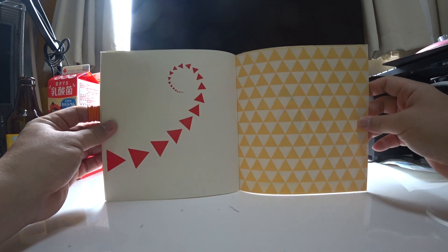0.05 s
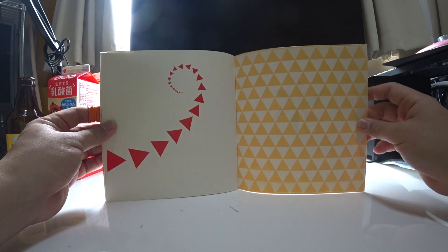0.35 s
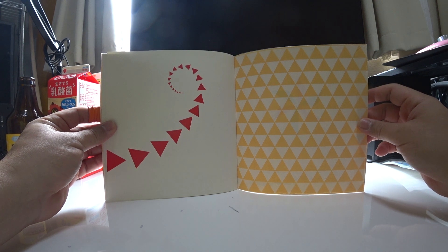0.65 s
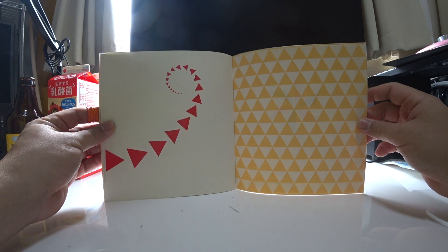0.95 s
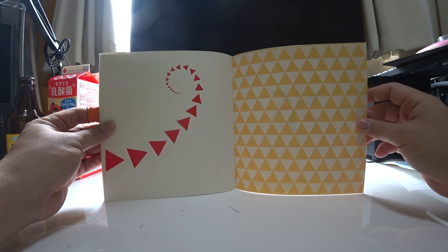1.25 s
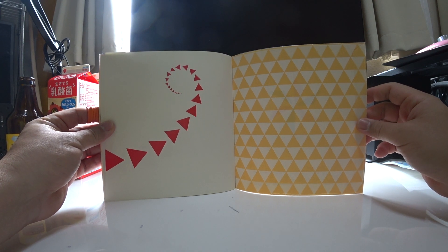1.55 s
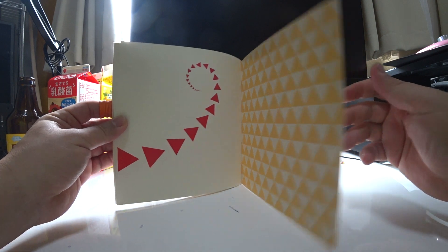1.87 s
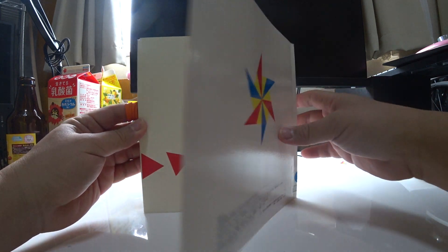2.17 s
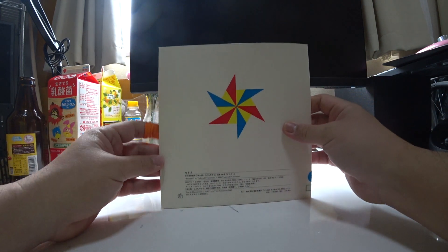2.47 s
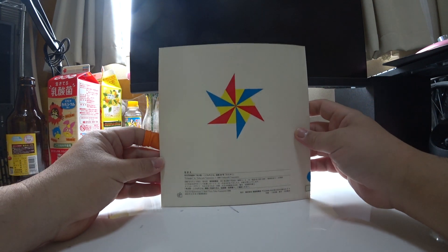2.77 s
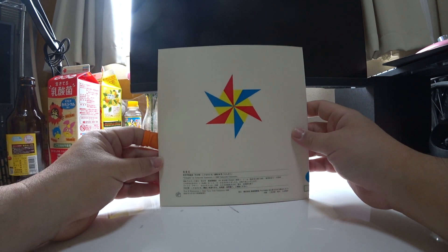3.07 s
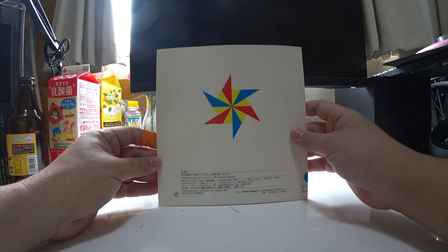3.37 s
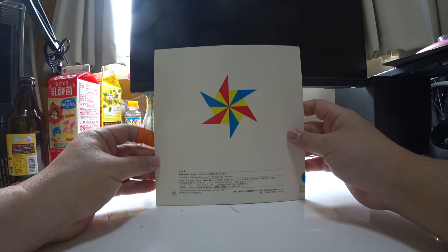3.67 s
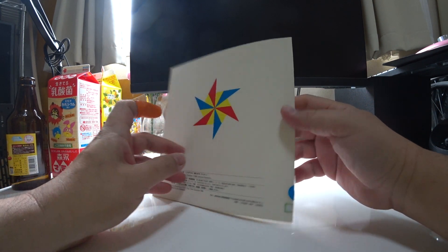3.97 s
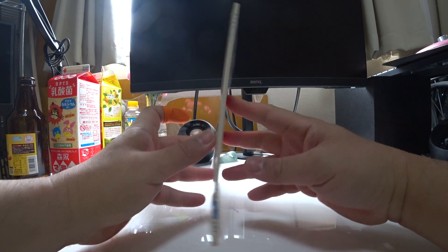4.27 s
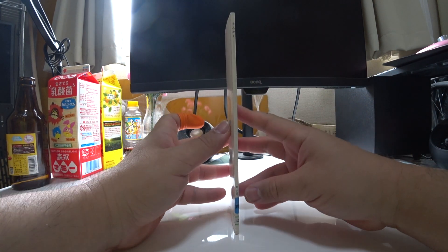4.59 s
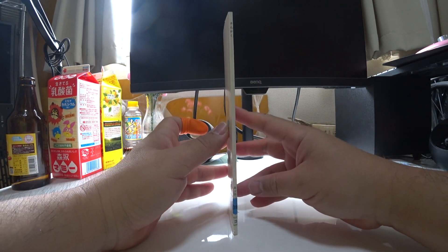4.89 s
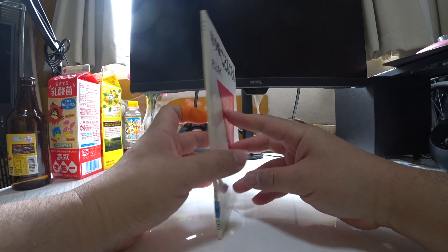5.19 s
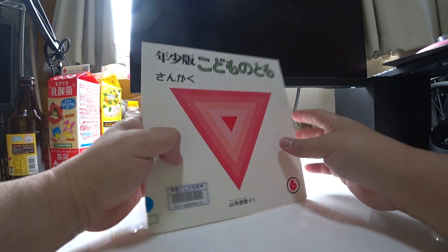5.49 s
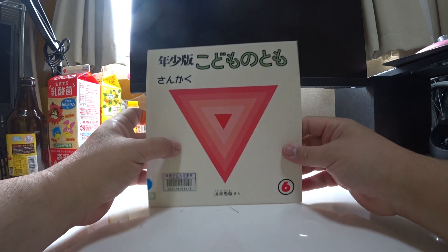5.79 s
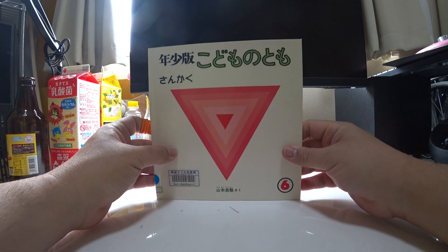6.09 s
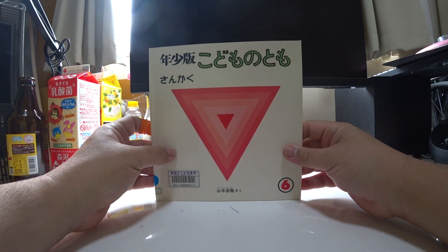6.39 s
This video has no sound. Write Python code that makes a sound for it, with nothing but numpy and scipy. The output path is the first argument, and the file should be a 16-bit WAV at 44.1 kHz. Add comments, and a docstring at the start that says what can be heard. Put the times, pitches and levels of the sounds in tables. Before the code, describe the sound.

A thin paperback is handled close to the microphone, centered, in a small room with a steady low hum and soft hiss. In the first half second there are a few light taps on a desk, small card snaps and a little rustle. After a pause, at about 1.8 seconds, the book closes with a firm knock, a cluster of smaller bumps and sliding, rubbing paper, dotted with crisp ticks until about 2.6. It is nearly still until a faint rustle at 3.7. Just before 4 seconds the card cover gives the sharpest snap, followed by small clicks and light rubbing. The book's edge knocks on the desk at around 4.4 to 4.5. From 5 to 6 seconds fingers brush the paper as it is turned, with a crisp click and tap near 5.4 and soft bumps after. A faint rustle and tick come near 6.4.

```python
"""Light knocks and a snap of card come first: a thin paperback is closed, stood on a desk and turned.
Each impact of an edge excites the damped modes of the desk top. The card cover snaps as it buckles,
and pages and fingers slide over the paper with stick-slip friction.
The book is close and central in stereo, in a small room with a low hum and a soft hiss."""
import sys
import numpy as np
from scipy import signal
from scipy.fft import rfft, irfft, next_fast_len
from scipy.io import wavfile

SR = 44100
rng = np.random.default_rng(int(sys.argv[2]) if len(sys.argv) > 2 else 0)


def transcribe(u):
    """Save the signal u as a 16-bit wav file named by the first command-line argument.

    u: samples, shape (n,) or (channels, n), limited to [-1, 1]; the rate is SR.
    q: integer samples, one column per channel.
    """
    v = np.clip(np.atleast_2d(u).T, -1, 1)
    q = np.round(v * 32767).astype(np.int16)
    wavfile.write(sys.argv[1], SR, q)


N = 288536

# Snaps of card and paper. Each row: start in seconds, level in dB, brightness in Hz, decay time in ms.
CARD_SNAPS = [(0.0604, -18.5, 1200, 3.9), (0.1374, -20.5, 4670, 1.7), (1.845, -25, 1600, 6),
              (1.8773, -20, 7000, 1.2), (2.0877, -23, 1900, 1.7), (2.1794, -13, 2600, 1.1),
              (2.1832, -15.5, 2560, 0.93), (2.309, -22, 7500, 8.2), (2.4299, -29.5, 3930, 1.9),
              (2.582, -24, 1400, 1.4), (2.5916, -30.5, 2440, 2), (3.7022, -30.5, 1930, 2.3),
              (3.943, -5.5, 3450, 2.05), (3.972, -22, 7000, 4.1), (3.982, -20, 4000, 1.4),
              (4.0161, -15.5, 4100, 2.6), (4.2457, -29.5, 2820, 1.5), (4.3026, -24, 1500, 6),
              (4.3469, -25.5, 6040, 3.1), (4.366, -23, 3160, 11), (4.4632, -26, 9100, 0.92),
              (5.3565, -15.5, 7060, 0.85), (5.4743, -32.5, 3000, 3.3), (5.489, -27.5, 5000, .8),
              (5.65, -33.5, 6200, 4.5), (6.4223, -31.5, 1600, 2.2)]


def from_db(db):
    """Decibels are logarithmic: 20 dB is a factor of ten in amplitude."""
    return 10 ** (np.asarray(db) / 20)


def unit_rms(x):
    """Normalisation brings a signal to a mean power of 1."""
    return x / np.sqrt(np.mean(x ** 2) + 1e-20)


def colour(x, curve):
    """Spectral shaping weights each frequency by a curve of (Hz, dB) points."""
    hz, db = np.transpose(curve)
    size = next_fast_len(len(x), True)
    bin_hz = np.fft.rfftfreq(size, 1 / SR) + 1e-3
    gain = from_db(np.interp(np.log(bin_hz), np.log(hz), db))
    return irfft(rfft(x, size) * gain, size)[:len(x)]


def drift(per_s):
    """Interpolation between random values gives a slow fluctuation of rms 1."""
    position = np.arange(N) / SR * per_s
    return unit_rms(np.interp(position, np.arange(8192), rng.standard_normal(8192)))


def cut(x, hz, kind, order=2):
    """A low-pass or high-pass filter falls by 6 dB per octave for each order."""
    return signal.sosfilt(signal.butter(order, min(hz, .45 * SR), kind, fs=SR, output="sos"), x)


def add(track, start_s, sound):
    """Superposition: a sound adds to the track from its start time on."""
    start = round(start_s * SR)
    track[start:start + len(sound)] += sound[:N - start]


def ring(t, hz, t60):
    """A damped mode is a sinusoid that loses 60 dB in t60 seconds."""
    return np.sin(2 * np.pi * hz * t) * from_db(-60 * t / t60)


def stereo(mid, side):
    """Left and right are the sum and difference of mid and side."""
    return np.array([mid + side, mid - side])


def background(air_db=-56.5, waver_db=2.0):
    """Broadband room noise lies under an appliance hum whose partials waver in amplitude and phase."""
    # Room noise. Each row: frequency in Hz, relative spectral density in dB.
    air_spectrum = [(12, -33), (20, -4), (86, -8.5), (138, -18), (172, -6), (204, -17), (241, -11.5),
                    (301, -18.5), (558, -21.5), (718, -24), (825, -24), (1220, -26.5), (1860, -28.5),
                    (12100, -41), (16000, -40.5)]
    # Its width. Each row: frequency in Hz, side relative to mid in dB.
    air_width = [(60, -21), (110, -6), (200, -6.5), (380, 4.5), (700, 7.5), (1290, 8), (2380, 5),
                 (4400, 0.5), (8120, -2.5), (15000, -2.5)]
    # The hum. Each row: frequency in Hz, rms level in dB about which the partial wavers.
    hum_partials = [(41.5, -61.5), (82, -60.5), (120, -66.5), (172, -76), (397, -75)]
    mid, side = [unit_rms(colour(white, air_spectrum)) for white in rng.standard_normal((2, N))]
    t, hum = np.arange(N) / SR, np.zeros(N)
    for hz, db in hum_partials:
        amplitude = np.sqrt(2) * from_db(db + waver_db * drift(7.4))
        hum += amplitude * np.sin(2 * np.pi * hz * t + 1.16 * drift(4))
    return from_db(air_db) * stereo(mid, colour(side, air_width)) + hum


def reverberation(x, t60=0.23, wet_db=-15, wall_hz=11000, gap_s=0.0059):
    """Diffuse reflections decay exponentially as the furnished room absorbs them."""
    # Width of the tail. Each row: frequency in Hz, side relative to mid in dB.
    tail_width = [(100, -26), (300, -11), (700, -4), (1500, 0.5), (4000, -5), (12000, 7.5)]
    t = np.arange(SR // 2) / SR
    fade = from_db(-60 * t / t60) * (t > gap_s)
    mid, side = cut(rng.standard_normal((2, len(t))), wall_hz, "low", order=1)
    response = stereo(mid, colour(side, tail_width)) * fade / np.sqrt(np.sum(fade ** 2))
    return from_db(wet_db) * signal.fftconvolve(x[None], response, axes=1)[:, :N]


def papery_colour(x):
    """Equalisation: fixed peaks and dips give snaps, cracks and rubbing one bright, papery colour."""
    # Each row: centre frequency in Hz, quality factor, gain in dB.
    peaks_and_dips = [(1014, 20, 5), (1470, 11, 6), (2300, 1.5, 1), (3240, 4.8, -4), (4570, 13, 5),
                      (6770, 5.1, 6), (9130, 5, -9), (11600, 2.5, 8)]
    for hz, q, db in peaks_and_dips:
        angle, gain = 2 * np.pi * hz / SR, from_db(db / 2)
        width = np.sin(angle) / (2 * q)
        forward = [1 + width * gain, -2 * np.cos(angle), 1 - width * gain]
        feedback = [1 + width / gain, -2 * np.cos(angle), 1 - width / gain]
        x = signal.lfilter(forward, feedback, x + 1e-18)
    return x


def crack(bright_hz, decay_ms, tail_db=-28, tail_ms=9, low_hz=600, period_ms=0.36, spike_ms=0.11):
    """A sudden release of stress gives a spike, then a dense rattle of the sheet lasting milliseconds."""
    ms = np.arange(4096) / SR * 1000
    envelope = np.exp(-ms / decay_ms) + from_db(tail_db) * np.exp(-ms / tail_ms)
    rattle = rng.standard_normal(len(ms)) * envelope
    spike = 1.13 * np.cos(2 * np.pi * ms / period_ms) * np.exp(-ms / spike_ms)
    burst = cut(rattle + spike, bright_hz, "low", order=1)
    burst = cut(burst, low_hz, "high", order=1)  # a thin sheet radiates little bass
    # a softer release loses treble but keeps its height
    return cut(burst, 1.32 * bright_hz, "low") * np.sqrt(1400 / bright_hz)


def creases(per_s=14, level_db=7.5, spread_db=5):
    """Bending paper ticks at independent random moments, as in shot noise."""
    onsets = rng.random(N) < per_s / SR
    sizes = from_db(level_db + spread_db * rng.uniform(-1, 1, N))
    return papery_colour(signal.fftconvolve(onsets * sizes, crack(bright_hz=3000, decay_ms=2.8))[:N])


def friction(spectrum, slips_per_s, grain_db, hiss, flutter_db):
    """Stick-slip friction: fibres catch and let go in unequal clicks over a hiss, swelling with pressure."""
    sizes = from_db(grain_db * np.minimum(rng.exponential(1, N), 5)) * rng.choice([-1, 1], N)
    slips = unit_rms(sizes * (rng.random(N) < slips_per_s / SR))
    sound = papery_colour(colour(slips + hiss * rng.standard_normal(N), spectrum))
    return unit_rms(sound * from_db(flutter_db * drift(140)))


def between_pages(x, echo_ms=.98, wander=.05, reflection=.4):
    """Comb filtering: an echo off the facing sheet makes hollow peaks that shift as the gap changes."""
    n = np.arange(N)
    lag = echo_ms * SR / 1000 * (1 + wander * drift(9))
    return unit_rms(x + reflection * np.interp(n - lag, n, x))


def stroke_gains(release_s=0.02, easing_db=3, uneven_db=1.5):
    """Incoherent sounds add in power; each stroke of the unsteady hand builds, eases and dies away."""
    # Strokes of a sheet or finger over paper. Each row: start, length and attack in seconds,
    # then relative levels of flexing, rubbing and surface hiss in dB.
    strokes = [(-.02, 0.12, .01, -56.5, -54.5, -58.5), (0.119, 0.07, 0.011, -51.5, -54.5, -62.5),
               (0.433, 0.013, .012, -44, -60.5, -62.5), (1.628, 0.16, 0.078, -54, -51, -56.5),
               (1.784, 0.081, 0.013, -49, -52, -63), (1.878, 0.16, 0.018, -41.5, -53, -48.5),
               (2.016, 0.19, .018, -49, -41.5, -47), (2.227, 0.1, 0.038, -40.5, -43, -49),
               (2.309, 0.12, .015, -71, -57.5, -54), (2.457, 0.15, 0.077, -51.5, -56.5, -60.5),
               (2.758, 0.059, 0.043, -70, -62, -68.5), (3.675, 0.19, 0.037, -56, -57.5, -74),
               (3.83, 0.22, .07, -66, -64, -59), (4.004, 0.37, 0.062, -62.5, -58.5, -57.5),
               (4.498, 0.12, 0.036, -55, -76, -63.5), (4.688, 0.069, .04, -77, -76, -68),
               (5.049, 0.14, 0.037, -70, -70, -61), (5.092, 0.0085, 0.0086, -70, -46, -46),
               (5.202, 0.2, 0.033, -55, -70, -64), (5.351, 0.059, 0.012, -45, -48.5, -53.5),
               (5.459, 0.15, 0.025, -58.5, -62.5, -58), (5.623, 0.18, .02, -52.5, -65.5, -65),
               (5.762, .15, 0.044, -52, -54.5, -53), (5.95, 0.089, 0.051, -54.5, -78, -74),
               (6.271, 0.079, 0.06, -61, -66, -62)]
    power = np.zeros((3, N))
    for start_s, length_s, attack_s, *levels_db in strokes:
        t = np.arange(N) / SR - start_s
        attack = np.clip(t / attack_s, 0, 1)
        pressure = from_db(easing_db * (.5 - np.clip(t / length_s, 0, 1)))
        release = np.exp(-np.clip((t - length_s) / release_s, 0, 20))
        power += np.outer(from_db(levels_db), attack * pressure * release) ** 2
    return np.sqrt(power) * from_db(uneven_db * drift(per_s=45))


def sliding(sheen_db=1.5):
    """The strokes modulate three bands of friction noise: low flexing, mid rubbing and a high sheen."""
    # Spectra of the three bands. Each row: frequency in Hz, relative spectral density in dB.
    flex_spectrum = [(30, -6), (90, 3), (270, -3), (450, -10), (620, -6.5), (900, -18.5), (1600, -33.5)]
    rub_spectrum = [(400, -28), (800, 10), (1000, -11.5), (1400, 3.5), (2100, 0.5), (3200, 2), (4800, -13),
                    (7500, -24)]
    sheen_spectrum = [(3000, -4), (5000, -2.5), (7000, -4), (9500, -2.5), (12000, -14), (13500, -16),
                      (16000, -18)]
    flex_gain, rub_gain, sheen_gain = stroke_gains()
    flex = friction(flex_spectrum, slips_per_s=1200, grain_db=2, hiss=1.0, flutter_db=3.5)
    sheen = friction(sheen_spectrum, slips_per_s=4500, grain_db=2.5, hiss=0.66, flutter_db=0.6)
    sheen = from_db(sheen_db) * between_pages(sheen)
    rub = friction(rub_spectrum, slips_per_s=2400, grain_db=3.0, hiss=0.47, flutter_db=2.5)
    rub = between_pages(rub) + creases()
    return flex_gain * flex + rub_gain * rub + sheen_gain * sheen


def clacks(hard_snap_db=-6.5, clack_db=-16.5, growth=1.93):
    """Nonlinear excitation: a hard snap sets the stiff cover ringing far more than a soft one."""
    # Modes of the cover. Each row: frequency in Hz, relative level in dB, 60 dB decay time in seconds.
    cover_modes = [(1318, -8.5, 0.038), (1620, -10, 0.029), (2270, -2, 0.0074), (4400, -0.5, 0.0035),
                   (7500, -8, 0.0054)]
    t, out = np.arange(SR // 10) / SR, np.zeros(N)
    ringing = sum(from_db(db) * ring(t, hz, t60) for hz, db, t60 in cover_modes)
    for start_s, db, _, _ in CARD_SNAPS:
        add(out, start_s, from_db(clack_db + growth * (db - hard_snap_db)) * ringing)
    return out


def snaps():
    """Elastic energy is released at once as the cover buckles or a page edge slips off a finger."""
    out = np.zeros(N)
    for start_s, db, bright_hz, decay_ms in CARD_SNAPS:
        add(out, start_s, from_db(db) * crack(bright_hz, decay_ms))
    return papery_colour(out)


def knocks(cycles=4.83, desk_db=-2, rebound_above_db=-20, rebound_s=.012, rebound_db=-7.5):
    """Impact excitation: each contact is a damped push that rings the desk modes near and below its pitch."""
    # The book meets the desk or itself. Each row: start in seconds, level in dB, contact pitch in Hz,
    # relative levels of the crack and of the desk's ring in dB.
    contacts = [(0.0604, -25.5, 332, -6, -0.5), (0.1487, -22, 450, -14, -2), (0.3627, -24, 485, -12, -4),
                (.43, -36, 570, -19, -3), (1.803, -25.5, 790, 1.5, -1), (1.8765, -10, 665, 2.5, -0.5),
                (1.877, -24, 117, -20, 9), (1.885, -17, 298, -32, -8), (1.895, -16.5, 596, -19, -5),
                (1.912, -16.5, 366, -32, -3), (1.968, -21.5, 328, -30, 2), (1.978, -22.5, 220, -30, -4),
                (2.087, -20, 330, 2, 5), (2.18, -31.5, 260, -17, 11), (2.268, -19.5, 684, -1.5, 4),
                (2.3116, -24, 770, -21, -1.5), (2.738, -40, 168, -28, 10), (3.001, -46, 168, -18, 13),
                (3.943, -27.5, 760, -8, 0), (3.9555, -22, 252, -32, 1), (3.969, -25, 354, -30, -3),
                (4.37, -21, 220, -30, 8), (4.422, -33, 238, -2, 11), (4.463, -14.5, 234, -2, 8.5),
                (4.4627, -20, 810, -5, -12.5), (4.592, -29.5, 171, -32, 11.5), (5.23, -35, 98, -6, 15.5),
                (5.3026, -27.5, 290, -3, 7.5), (5.3554, -25, 674, 2, -5), (5.711, -33.5, 550, -4, 1.5),
                (5.719, -35, 126, -26, 15.5), (5.843, -36, 177, -21, 6)]
    # Modes of the desk top. Each row: frequency in Hz, relative level in dB, 60 dB decay time in seconds.
    desk_modes = [(82, -15, .13), (104, -20, .12), (134, -22, .15), (170, -22, .15), (210, -21, .18),
                  (266, -17, .18), (290, -24, .14), (329, -21, .19), (365, -26, .15), (394, -26, .18),
                  (440, -28, .14), (470, -29, .14), (534, -25, .13), (587, -15, .16), (641, -17, .14),
                  (760, -26, .12), (817, -24, .13), (898, -24, .14), (1008, -18, .13), (1287, -22, .1)]
    t = np.arange(SR // 4) / SR
    thuds, cracks = np.zeros(N), np.zeros(N)
    mode_hz, mode_db, t60 = np.transpose(desk_modes)
    modes = ring(t, mode_hz[:, None], t60[:, None])
    polarity = (-1) ** np.arange(len(modes))  # neighbouring modes swing in opposite senses
    for start_s, db, pitch_hz, crack_db, ring_db in contacts:
        ratio = mode_hz / pitch_hz
        coupling = 2 * ratio ** 1.15 / (1 + ratio ** 4.15)
        shares = from_db(mode_db + rng.normal(0, 1, len(modes)))  # vary with where the book lands
        desk = from_db(desk_db + ring_db) * ((coupling * shares * polarity) @ modes)
        push = 1.635 * cut(ring(t, pitch_hz, cycles / pitch_hz), 2.13 * pitch_hz, "low")
        add(thuds, start_s, from_db(db) * (push + desk))
        if db > rebound_above_db:  # after a heavy knock the springy book touches again
            add(thuds, start_s + rebound_s, from_db(db + rebound_db) * push)
        add(cracks, start_s, from_db(db + crack_db) * crack(bright_hz=1700, decay_ms=4.5))
    return cut(thuds, 88, "high") + papery_colour(cracks)


def scene(lead=0.2, pan_db=0.15):
    """Direct sound, reverberation and background superpose; the book leads slightly in phase on the left."""
    book = knocks() + snaps() + clacks() + sliding()
    quadrature = signal.hilbert(book, next_fast_len(N)).imag[:N]
    direct = stereo(book, -lead * quadrature) * from_db([[pan_db], [-pan_db]])
    return direct + reverberation(book) + background()


def record(dry, cutoff_hz=15900):
    """An elliptic low-pass filter cuts the highest treble steeply."""
    return signal.sosfilt(signal.ellip(12, .1, 70, cutoff_hz, fs=SR, output="sos"), dry)


dry = scene()
out = record(dry)
transcribe(out)
```